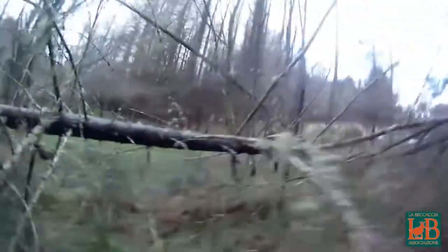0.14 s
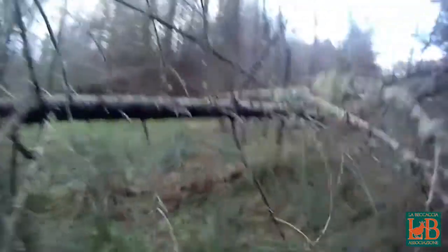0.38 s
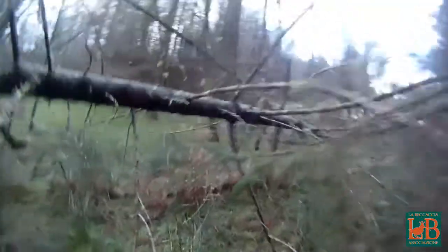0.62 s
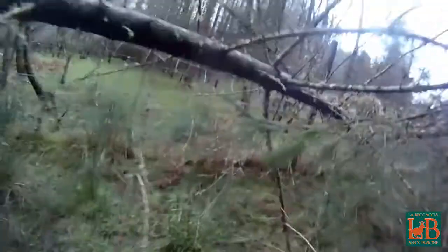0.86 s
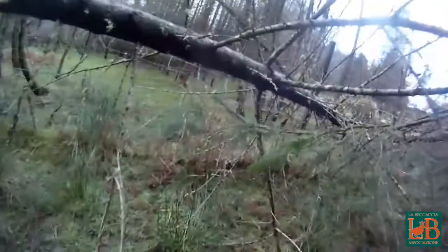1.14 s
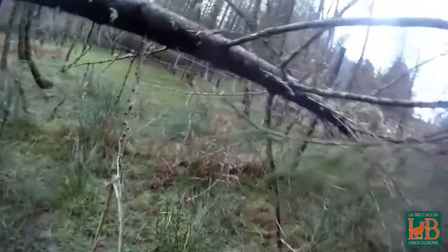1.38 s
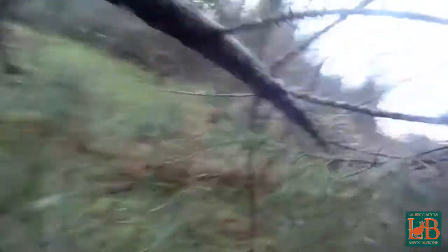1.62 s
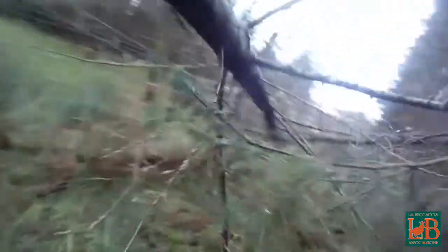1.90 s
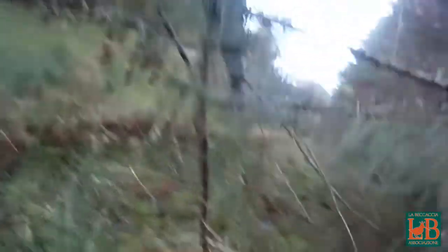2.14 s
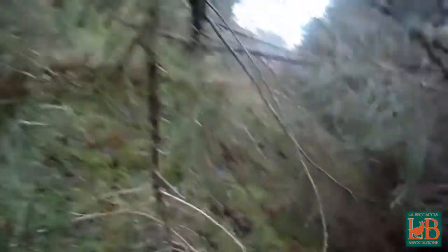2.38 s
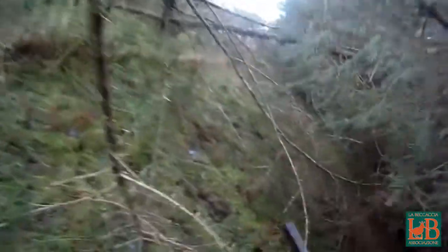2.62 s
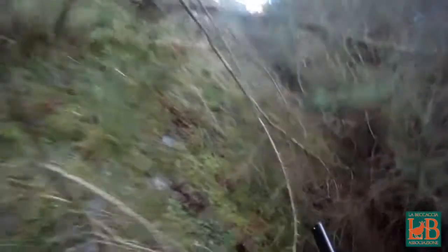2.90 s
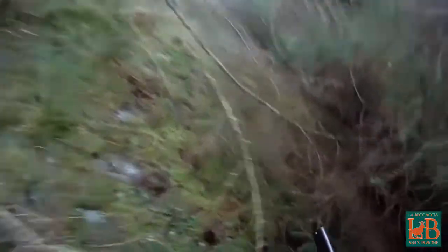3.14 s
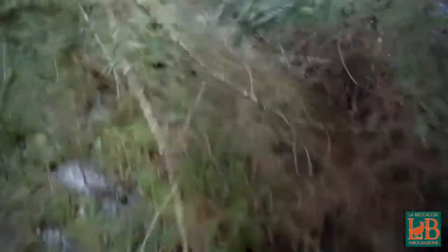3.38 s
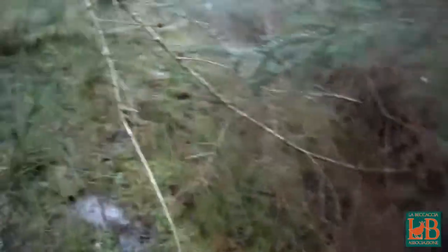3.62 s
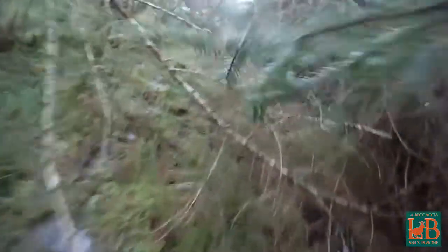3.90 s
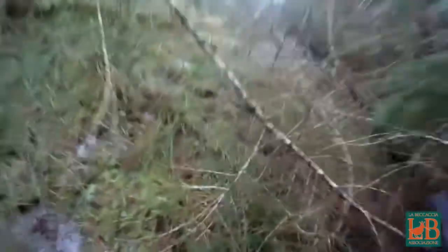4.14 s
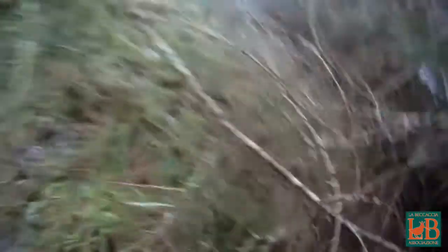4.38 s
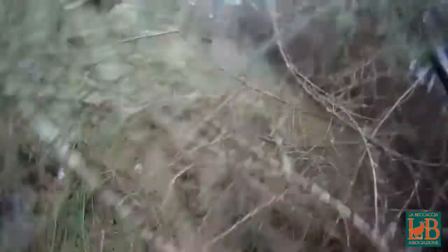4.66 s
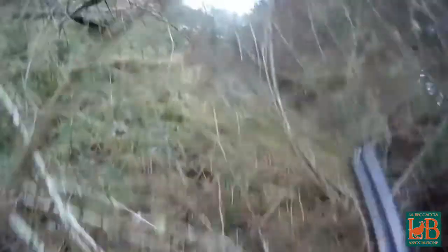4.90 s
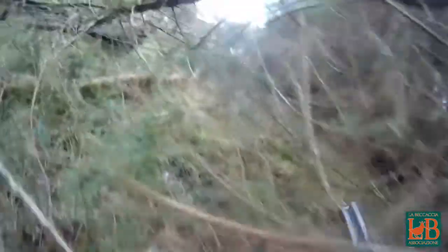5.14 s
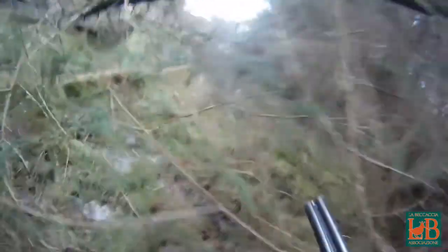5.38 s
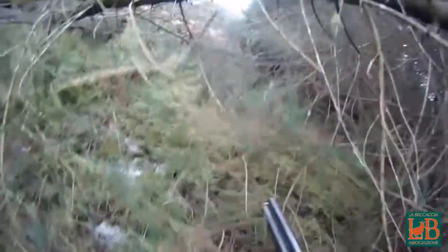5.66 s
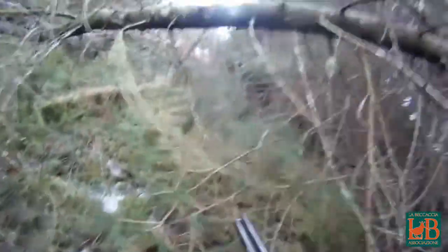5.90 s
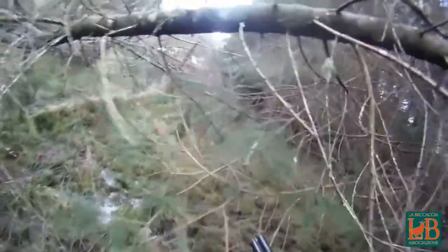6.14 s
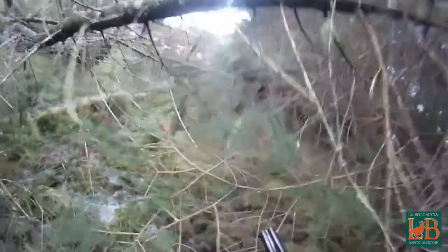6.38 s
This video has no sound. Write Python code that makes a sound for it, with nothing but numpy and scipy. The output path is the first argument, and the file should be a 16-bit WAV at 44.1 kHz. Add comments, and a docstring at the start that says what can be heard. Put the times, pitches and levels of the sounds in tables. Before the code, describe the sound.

Very close, essentially mono sound from a small plastic-cased camera moving through woodland. Quiet swishes of grass rise and fall over soft, deep wind rumble, with scattered twig ticks. Contacts grow harder, with bright plastic snaps, a heavy crack and dull mount thumps, then a packed, gritty volley of scraping twigs overloads the microphone. Suddenly it thins to a couple of short scrapes and knocks, fading into faint brushing.

```python
"""Forest undergrowth, with a small camera carried through it. Grass and needles rustle as filtered noise
and tiny slips; twigs tap and scrape the plastic shell as bursts of grit through its resonances. The mount
thumps with short low swings and rubs in lumps of noise, and wind rumbles as slow, deep noise on the single
microphone. The loudest scrapes overload the input; faint noise has opposite sign in the two channels."""
import sys
import numpy as np
from scipy import signal
from scipy.fft import rfft, irfft, next_fast_len
from scipy.io import wavfile
from scipy.ndimage import map_coordinates

SR = 44100
rng = np.random.default_rng(int(sys.argv[2]) if len(sys.argv) > 2 else 0)


def unload_audio(sound):
    """Save the sound as a 16-bit wav file, at the path given as the first command line argument."""
    columns = np.transpose(np.atleast_2d(sound))
    # keep every value between -1 and 1, then stretch to whole-number steps
    steps = np.round(np.clip(columns, -1, 1) * 32767)
    wavfile.write(sys.argv[1], SR, steps.astype(np.int16))


def makeup_ratio(level_db):
    """Linear amplitude ratio for a level in decibels (20 dB per factor of ten)."""
    decades = np.asarray(level_db, float) / 20
    return 10 ** decades


N = 287532  # length [samples]


def unit(x):
    """Scaled to rms 1."""
    return x / np.sqrt(np.mean(x ** 2) + 1e-20)


def wobble(rate):
    """A smooth random curve through rate knots a second."""
    knots = rng.standard_normal(int(N * rate / SR) + 4)
    return map_coordinates(knots, [np.arange(N) * rate / SR])


def curves(rows):
    """One level per sample for each column after the time."""
    time_s, *columns = np.transpose(rows)
    return [np.interp(np.arange(N) / SR, time_s, column) for column in columns]


def coloured(x, gain):
    """x through the minimum-phase filter with this gain over frequency, scaled so white noise keeps its rms."""
    size = 2 * next_fast_len(N // 2 + 8192)
    cepstrum = irfft(np.log(gain(np.fft.rfftfreq(size, 1 / SR)) + 1e-6), size)
    # folding the cepstrum forward in time makes the filter causal
    cepstrum[1:size // 2] *= 2
    cepstrum[size // 2 + 1:] = 0
    response = np.exp(rfft(cepstrum))
    filtered = irfft(rfft(x, size) * response, size)[:N]
    return filtered / np.sqrt(np.mean(np.abs(response) ** 2))


def slopes(points):
    """Gain of (frequency [Hz], level [dB]) points joined on a log frequency axis."""
    f, db = np.transpose(points)
    return lambda hz: makeup_ratio(np.interp(np.log(hz + 1), np.log(f + 1), db))


def peaks(modes, steep, above_hz=1):
    """Gain of a set of resonances with skirts of this steepness, cut below above_hz."""
    def gain(hz):
        bells = sum(makeup_ratio(db) / (1 + (2 * (hz - c) / w) ** 2) ** steep for c, w, db in modes)
        return bells / (1 + (above_hz / (hz + 1)) ** 4)
    return gain


def grit(rate, spread_db, share):
    """Noise of rms 1 in which this share of the power is tiny random slips, rate a second on average."""
    slips = (rng.random(N) < rate / SR) * makeup_ratio(spread_db * rng.standard_normal(N))
    slips = slips * np.sign(rng.standard_normal(N))
    return np.sqrt(share) * unit(slips) + np.sqrt(1 - share) * rng.standard_normal(N)


# air path through the microphone port: (frequency [Hz], width [Hz], relative level [dB])
PORT_MODES = [(780, 900, -23), (1196, 283, -1.5), (1962, 383, 6), (2478, 213, -3), (3530, 220, -10),
              (4550, 700, -38), (6500, 600, -38.5), (8120, 97, -23), (9915, 1040, -17.5),
              (9910, 130, -27.5), (13830, 375, -18.5), (14360, 210, -22), (15400, 340, -41)]


def muffled(hz):
    """Rubbing through the mount keeps the low port tones and a thin top, but little middle treble."""
    low = 1 / (1 + (hz / 3600) ** 5)
    thin_top = 2.4 / (1 + (8300 / (hz + 1)) ** 12)
    return peaks(PORT_MODES, 0.9)(hz) * (low + thin_top)


# ring of the plastic shell under contact: (frequency [Hz], width [Hz], relative level [dB])
SHELL_MODES = [(3340, 270, 1.5), (3700, 350, 11), (4850, 350, -4), (5630, 1300, -29.5), (7050, 700, -10),
               (8040, 190, -2), (8610, 196, -1), (9000, 130, -2.5), (10200, 70, -24), (13100, 100, -15),
               (14900, 81, -12), (14500, 300, -36), (14240, 87, -13.5)]
# brushing through the growth: (time [s], rustle level [dB], dry hiss level [dB])
BRUSHING = [(0, -52.5, -56), (0.33, -45, -50), (0.62, -54, -58.5), (0.88, -44.5, -53), (1.25, -57.5, -57.5),
            (1.52, -52, -58), (1.63, -46, -52), (1.76, -50, -55.5), (1.95, -43.5, -50.5), (2.18, -53, -56),
            (2.8, -54, -59.5), (3.1, -52.5, -57), (3.25, -44.5, -56), (3.6, -48, -57.5), (3.9, -40, -51.5),
            (4.02, -49.5, -56), (4.42, -45, -57.5), (4.49, -34.5, -50.5), (4.7, -36, -49.5),
            (4.88, -30, -31.5), (4.96, -29, -32.5), (4.995, -34.5, -41), (5.05, -25, -23),
            (5.16, -20.5, -23), (5.28, -37, -41), (5.335, -46, -64), (5.42, -43, -51), (5.63, -40.5, -61),
            (5.79, -39.5, -55), (5.81, -50.5, -58.5), (6.17, -54.5, -57), (6.52, -52.5, -54.5)]


def rustle():
    """Stems slide past in clumps: a muffled body and a drier hiss; hard brushing also rings the shell."""
    body_db, hiss_db = curves(BRUSHING)
    clumps_db = 0.36 * wobble(16) + 2.2 * wobble(45)
    body = coloured(grit(1000, 4, 0.34), muffled)
    body = body * makeup_ratio(body_db + clumps_db + 0.49 * wobble(25))
    touch = 1 / (1 + makeup_ratio(-37.5 - hiss_db) ** 2)  # share of the hiss carried by the shell
    port = coloured(grit(1500, 1.8, 0.37), peaks(PORT_MODES, 0.51, above_hz=3200))
    shell = coloured(grit(2100, 2.9, 0.17), peaks(SHELL_MODES, 0.64))
    hiss = np.sqrt(1 - touch) * port + np.sqrt(touch) * shell
    return body + hiss * makeup_ratio(hiss_db + 0.16 * clumps_db + 0.9 * wobble(67))


# twigs on the shell itself: (time [s], level [dB], shell ring over it [dB], fade [ms])
TWIG_TAPS = [(0.09, -43, -1, 14), (0.304, -51, 13, 14), (0.47, -19, -1, 5.6), (0.6124, -34, 0, 4.4),
             (0.772, -37, -1.5, 30), (0.793, -34, -1, 22), (1.9695, -38, -1, 6.7), (2.027, -38, -9, 37),
             (2.05, -39.5, -2, 20), (2.783, -38.5, -10, 6.6), (3.2801, -32.5, -10.5, 39),
             (3.306, -26, -16, 14), (3.732, -18, 6, 9.4), (3.746, -19.5, 12, 5.3), (3.8858, -33, -8, 14),
             (4.0388, -11, -7.5, 9.3), (4.0445, -3, -6, 8.9), (4.059, -9.5, 2.5, 14), (4.5635, -36, 3, 9),
             (4.7248, -4.5, 3, 16), (4.758, -24, -4, 11), (4.7713, -17, 0, 15), (4.796, -26.5, -12, 17),
             (4.8134, -24, 2.5, 8), (4.833, -19, -15.5, 13), (4.8755, -11, -1.5, 7), (4.8932, -18.5, -2, 7),
             (4.9016, -13, -2.5, 7.9), (4.9148, -10, 3, 3), (4.9448, -3.5, -2.5, 6.1),
             (4.9627, -18.5, -11.5, 20), (4.9818, -16, 1, 4.6), (5.016, -9, -2.5, 9), (5.031, -9.5, -2, 10),
             (5.0442, -5, -5, 7.1), (5.058, -6.5, -12, 15), (5.0656, -10.5, 6.5, 8.5),
             (5.0765, -16.5, 2, 10), (5.0858, -7, -3, 12), (5.097, -8.5, 7, 5.1), (5.1054, -3, -3.5, 11),
             (5.1213, -25, 13, 20), (5.1341, -3.5, -7, 3.8), (5.1457, -12.5, 4, 14),
             (5.1563, -12.5, 6.5, 11), (5.166, -14, 8.5, 11), (5.1748, -8.5, 3, 11.5),
             (5.1817, -22, 5, 4.6), (5.194, -28, 11, 20), (5.209, -29, 11, 21), (5.2203, -15, 3, 20),
             (5.2344, -7, -9.5, 25), (5.2464, -7, -7, 11), (5.2627, -6.5, -5.5, 18),
             (5.287, -6.5, -4.5, 16), (5.299, -5.5, 0.5, 5.7), (5.5612, -12, -3.5, 23),
             (5.5771, -11, -1.5, 9.3), (5.5844, -17, 5, 6.5), (5.9099, -19.5, -11.5, 9.9),
             (5.9248, -31, -5, 16), (5.9649, -36, 0, 12), (6.0906, -39.5, 4.5, 6.7), (6.1236, -40, -6, 18),
             (6.4864, -43.5, 3, 19.5)]
# dull contacts through the mount: (time [s], level [dB], case knock over it [dB], fade [ms])
MOUNT_BUMPS = [(3.069, -24, -10, 5.1), (3.1648, -50.5, 15, 9), (3.2292, -47, 7, 8),
               (3.2711, -35, 3.5, 13.6), (3.5087, -29, -3, 3.5), (3.8188, -34.5, -0.5, 6.3),
               (3.8563, -34.5, 1.5, 12), (3.9456, -24.5, -11, 19), (3.9605, -24, -9.5, 14),
               (3.975, -19.5, -5, 11), (3.9872, -21.5, 1.5, 16), (4.004, -31.5, 1.5, 19.5),
               (4.171, -36.5, -1.5, 17), (4.1925, -35.5, -0.5, 24), (4.2078, -26.5, 0.5, 5),
               (4.4724, -30.5, -0.5, 16), (4.4968, -32.5, 2.5, 20), (4.526, -31, 4.5, 10),
               (4.5926, -24, -3, 12), (4.622, -32, 4.5, 8), (4.6404, -25.5, 3, 6), (4.6794, -23.5, -15, 14),
               (4.6901, -22.5, -1, 9.6), (4.6982, -19.5, -2, 10), (5.3219, -7.5, -5, 2.4),
               (5.3459, -29, -6, 9.9), (5.4246, -23, -27, 3.6), (5.4965, -34.5, 0, 32),
               (5.536, -26.5, -6, 16), (5.545, -22.5, -1.5, 11), (5.6482, -24.5, -9, 9),
               (5.745, -30.5, -5, 30), (5.7686, -32.5, 2.5, 12), (5.784, -32.5, -2, 8)]
TAP_KNOCK_DB, BUMP_RING_DB = -11.5, -30  # a tap barely knocks the case, a bump barely rings the shell
KNOCK_DB_PER_DOUBLING, USUAL_FADE_MS = 4, 10.3  # longer scrapes load the case more, short snaps less
# stray touches: level over the rustle and its spread, knock over that level and its spread, median fade
STRAY_DB, STRAY_SPREAD_DB = 1, 3
STRAY_KNOCK_DB, KNOCK_SPREAD_DB, STRAY_FADE_MS = -7, 2, 15.6


def contacts(count=130):
    """Time, level, ring, knock and fade of taps, bumps and random strays that are as bright as the brushing."""
    doublings = np.log2(np.transpose(TWIG_TAPS)[3] / USUAL_FADE_MS)
    knock_db = TAP_KNOCK_DB + KNOCK_DB_PER_DOUBLING * doublings
    taps = np.insert(TWIG_TAPS, 3, knock_db, axis=1)
    bumps = np.insert(MOUNT_BUMPS, 2, BUMP_RING_DB, axis=1)
    when, draw = rng.random(count), rng.standard_normal((count, 3))
    body_db, hiss_db = np.array(curves(BRUSHING))[:, (when * N).astype(int)]
    strays = [when * N / SR,
              body_db + STRAY_DB + STRAY_SPREAD_DB * draw[:, 0],
              hiss_db - body_db,
              STRAY_KNOCK_DB + KNOCK_SPREAD_DB * draw[:, 1],
              STRAY_FADE_MS * np.exp(draw[:, 2] / 2)]
    return np.hstack([taps.T, bumps.T, strays])


DRAG_SHARE, RISE_SHARE = 0.26, 0.057  # shares of the fade: steady press, and added build-up time


def strokes(time_s, fade_ms, db):
    """Contact pressure of all twigs: long drags build up slowly, then the twig lets go ever faster."""
    step = np.arange(SR // 12)
    ms = 1000 * step / SR
    fade = np.maximum(fade_ms, 1)[:, None]
    rise = 1 - np.exp(-ms / (0.6 + RISE_SHARE * fade))
    snap = 1 + 0.27 * np.exp(-ms / 0.21)
    late = np.maximum(ms / fade - DRAG_SHARE, 0)
    shape = rise * snap * makeup_ratio(-12 * late - 9.2 * late ** 2)
    at = (np.round(time_s * SR).astype(int)[:, None] + step).ravel()
    power = ((makeup_ratio(db)[:, None] * shape) ** 2).ravel()
    return np.sqrt(np.bincount(at, power, N + SR)[:N])  # overlapping strokes add in power


# hollow knock of the case: (frequency [Hz], width [Hz], relative level [dB])
CASE_MODES = [(890, 490, -7.5), (1259, 223, 3.5), (1427, 210, -5)]


def twigs():
    """Each contact chatters into the port and knocks the case; hard ones ring the shell, light ones tick."""
    time_s, port_db, ring_db, knock_db, fade_ms = contacts()

    def scrape(db):
        """Fresh chatter under the contact pressure."""
        return grit(2000, 4.47, 0.73) * makeup_ratio(1.9 * wobble(300)) * strokes(time_s, fade_ms, db)

    port = coloured(scrape(port_db), lambda hz: muffled(hz) / (1 + (1600 / (hz + 1)) ** 6))
    case = coloured(scrape(port_db + knock_db), peaks(CASE_MODES, 1.175))
    bright_db = port_db + ring_db
    hard = 1 / (1 + makeup_ratio(-17.5 - bright_db) ** 4)  # share of the treble that rings the shell
    tick = scrape(bright_db + 10 * np.log10(1 - hard))
    tick = coloured(tick, peaks(PORT_MODES, 0.32, above_hz=2430))
    # the spot that is touched wanders, so neighbouring shell modes trade strength
    ring = scrape(bright_db - 6.0 + 10 * np.log10(hard))
    spot_db = 6.8 * wobble(40)
    even_modes = coloured(ring * makeup_ratio(spot_db), peaks(SHELL_MODES[::2], 0.84))
    odd_modes = coloured(ring * makeup_ratio(-spot_db), peaks(SHELL_MODES[1::2], 0.49))
    return port + case + tick + even_modes + makeup_ratio(-4.0) * odd_modes


# jolts of the mount: (time [s], peak level [dB], pitch [Hz])
MOUNT_JOLTS = [(3.039, -25, 108), (3.082, -28.5, 79.5), (3.86, -27, 223), (3.989, -16, 320),
               (3.995, -9, 177), (4.053, -17, 260), (4.067, -21, 100), (4.196, -28, 238),
               (4.446, -25.5, 170), (4.466, -28, 186), (4.494, -30, 120), (4.519, -27, 257),
               (4.551, -24, 148), (4.691, -22, 93), (4.949, -17.5, 347), (5.098, -25, 120),
               (5.239, -23, 160), (5.271, -20, 122), (5.326, -27.5, 180), (5.446, -28.5, 200),
               (5.521, -31, 246), (5.736, -32.5, 150)]
# rubbing of the mount: (time [s], level [dB])
MOUNT_RUB = [(0, -55.5), (0.85, -54), (1.3, -56), (1.95, -54), (2.95, -56.5), (3.05, -47.5), (3.18, -53.5),
             (3.9, -51), (4.02, -43), (4.12, -53.5), (4.42, -54.5), (4.46, -48), (4.7, -39.5), (4.8, -46),
             (5.0, -54.5), (5.05, -30), (5.19, -45), (5.27, -35), (5.36, -57), (5.45, -47.5), (6.17, -60.5),
             (6.52, -57)]
# colour of the rubbing: (frequency [Hz], relative level [dB per Hz])
RUB_COLOUR = [(29, -35), (50, -3), (259, -8.5), (361, -13), (700, -23), (910, -46), (1540, -120)]
JOLT_CYCLES = 0.37  # standard deviation of a swing's bell-shaped envelope [cycles]


def thumps():
    """The mount rubs in uneven low lumps; a jolt swings it for a cycle or two."""
    time_s, db, hz = np.transpose(MOUNT_JOLTS)[:, :, None]
    step = np.arange(-SR // 25, SR // 25)
    cycles = hz * step / SR
    swings = makeup_ratio(db) * np.cos(2 * np.pi * cycles) * np.exp(-(cycles / JOLT_CYCLES) ** 2 / 2)
    at = np.round(time_s * SR).astype(int) + step
    jolts = np.bincount(at.ravel(), swings.ravel(), N)
    lumps = makeup_ratio(2 * wobble(20))
    rub = coloured(rng.standard_normal(N), slopes(RUB_COLOUR))
    return jolts + rub * makeup_ratio(curves(MOUNT_RUB)[0]) * lumps


# wind on the port: (time [s], level [dB])
WIND_GUSTS = [(0.0, -40), (0.91, -36.5), (0.94, -44.5), (2.01, -40), (2.8, -46.5), (3.12, -38),
              (3.27, -49.5), (3.94, -45.5), (4.01, -29), (4.18, -58), (4.28, -43), (4.34, -57),
              (4.59, -32.5), (5.16, -54), (5.28, -37), (5.34, -48), (6.43, -45.5), (6.52, -50)]
# colour of the wind: (frequency [Hz], relative level [dB per Hz])
WIND_COLOUR = [(8.8, -30.5), (15, 10.5), (41, -1), (52, 1.5), (70, -31), (221, -27.5), (369, -28),
               (900, -27.5), (1170, -48), (1980, -120)]


def wind():
    """Air buffets the port with a slow, deep rumble."""
    rumble = coloured(rng.standard_normal(N), slopes(WIND_COLOUR))
    return rumble * makeup_ratio(curves(WIND_GUSTS)[0] + 0.54 * wobble(5.3))


# colour of the opposed noise: (frequency [Hz], relative level [dB per Hz])
OPPOSED_COLOUR = [(59, -31), (100, -6.5), (4680, -11), (12000, -21.5), (15600, -54.5), (22000, -120)]


def opposed_noise():
    """Faint steady noise, to be added to one channel and taken from the other."""
    return makeup_ratio(-71.0) * coloured(rng.standard_normal(N), slopes(OPPOSED_COLOUR))


# cancellations in the port: (frequency [Hz], width [Hz])
PORT_NOTCHES = [(6050, 400), (11900, 3900)]


def scene():
    """One microphone feeds both channels; faint steady noise is added with opposite sign."""
    heard = rustle() + twigs()
    for hz, width_hz in PORT_NOTCHES:
        b, a = signal.iirnotch(hz, hz / width_hz, SR)
        heard = signal.lfilter(b, a, heard)
    mono = heard + thumps() + wind()
    opposed = opposed_noise()
    return np.array([mono + opposed, mono - opposed])


BURST_DB, BURST_DECAY_S, BURST_HZ = -38, 0.035, 250  # noise level, decay time constant, bass corner


def overload(dry):
    """The input rounds off at full scale; low noise of opposite sign in the two channels follows each overload."""
    full = dry / (1 + np.abs(dry) ** 8) ** (1 / 8)
    keep = np.exp(-1 / (BURST_DECAY_S * SR))
    excess = np.abs(dry - full)[0]
    envelope = np.tanh(60 * signal.lfilter([1 - keep], [1, -keep], excess))
    bass = coloured(rng.standard_normal(N), lambda hz: 1 / (1 + (hz / BURST_HZ) ** 2) / np.sqrt(hz + 20))
    burst = makeup_ratio(BURST_DB) * envelope * unit(bass)
    return full + [burst, -burst]


def low_pass(x):
    """Removes everything above the highest recorded frequency."""
    return signal.sosfilt(signal.butter(12, 16180, fs=SR, output="sos"), x)


def record(dry):
    """The input overloads, then the finished mix passes through the last stage."""
    mix = overload(dry)
    return low_pass(mix)


dry = scene()
out = record(dry)
unload_audio(out)
```